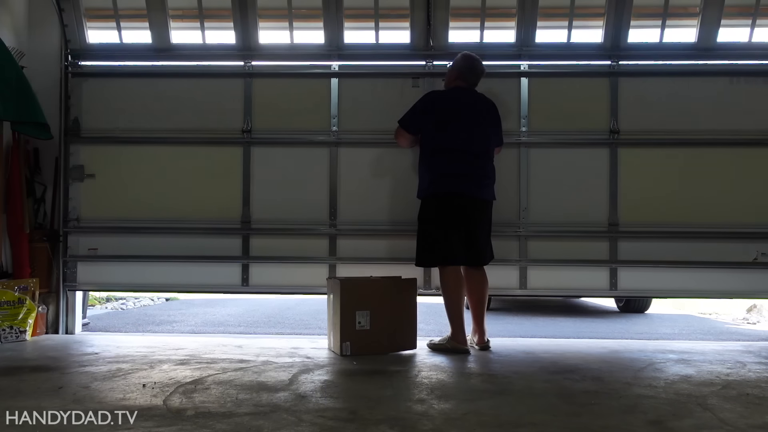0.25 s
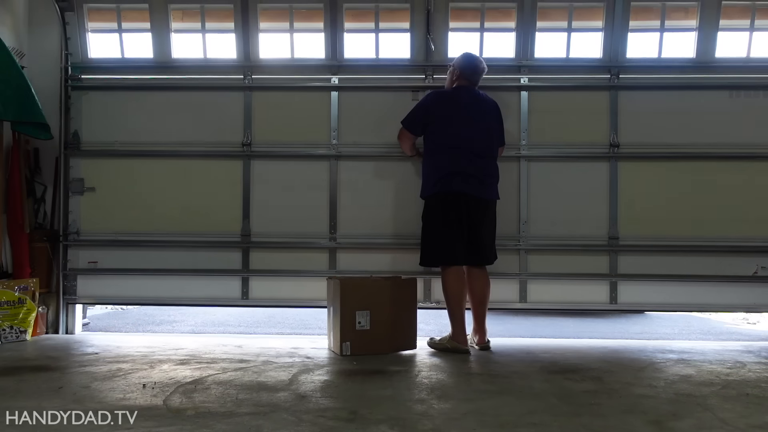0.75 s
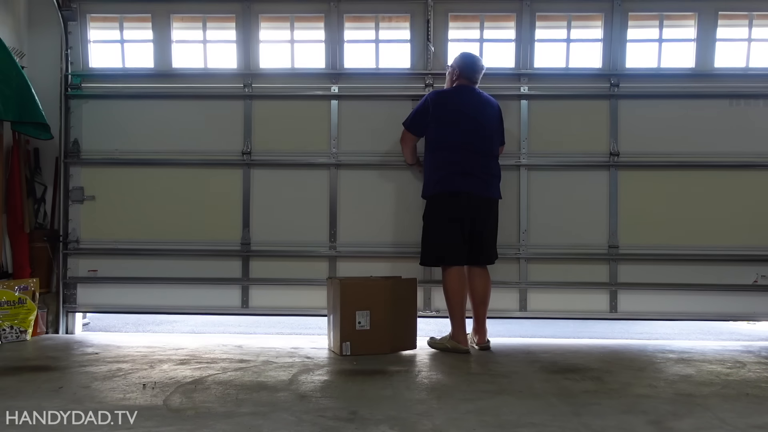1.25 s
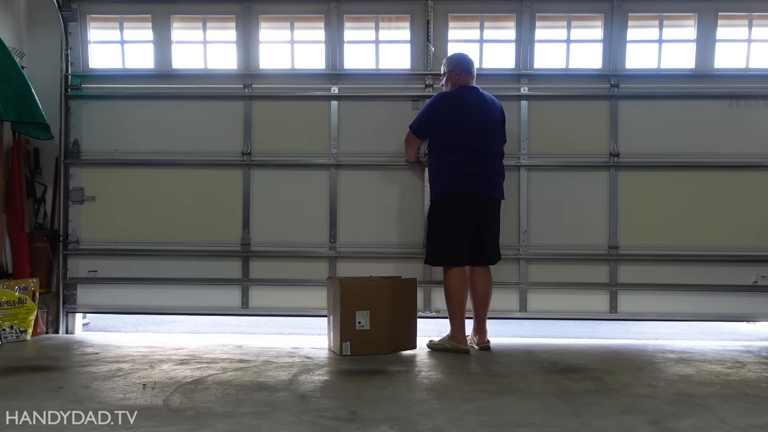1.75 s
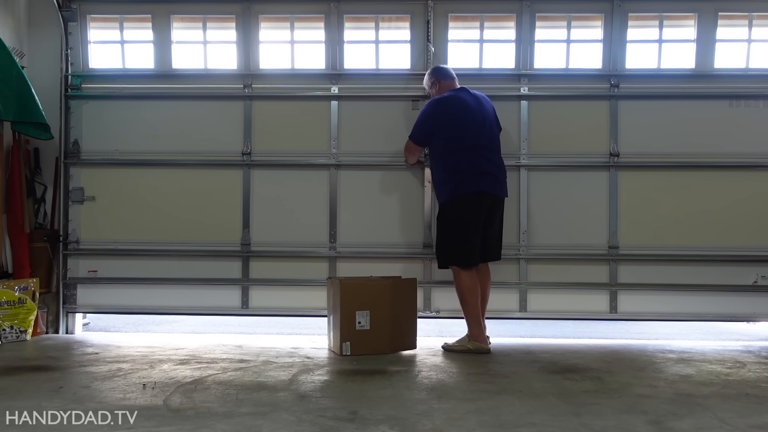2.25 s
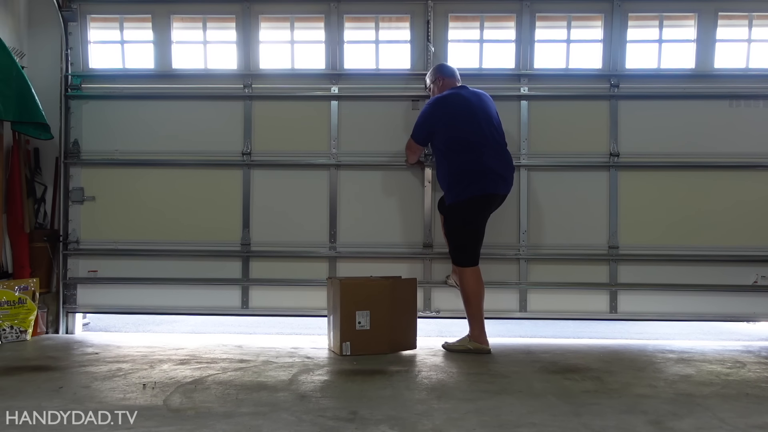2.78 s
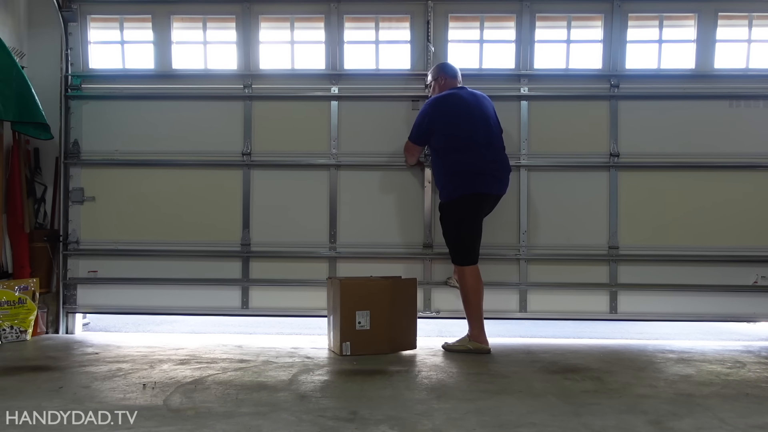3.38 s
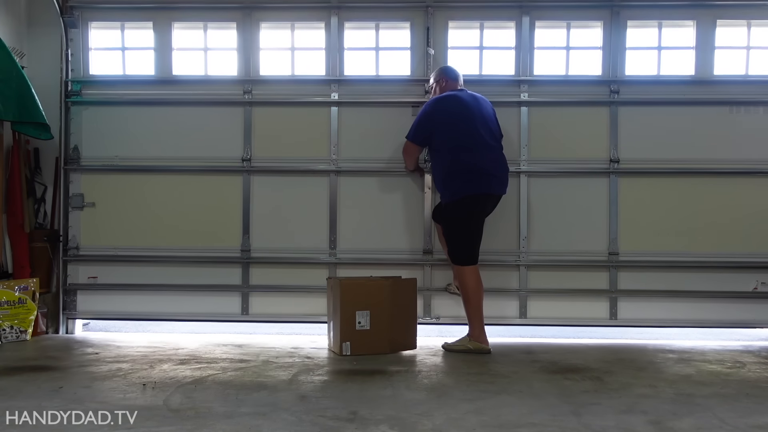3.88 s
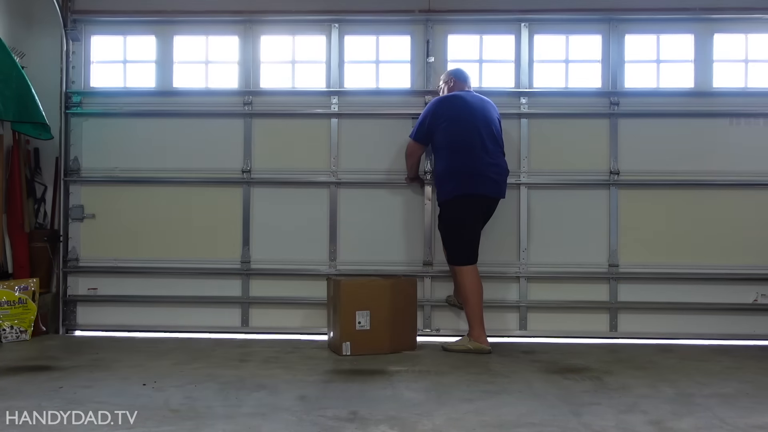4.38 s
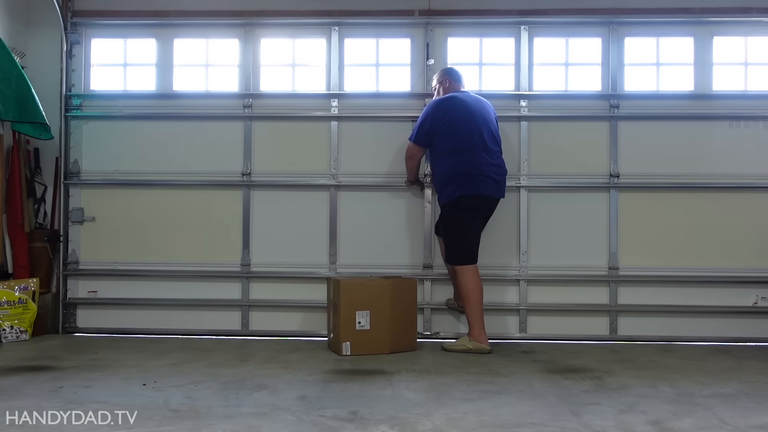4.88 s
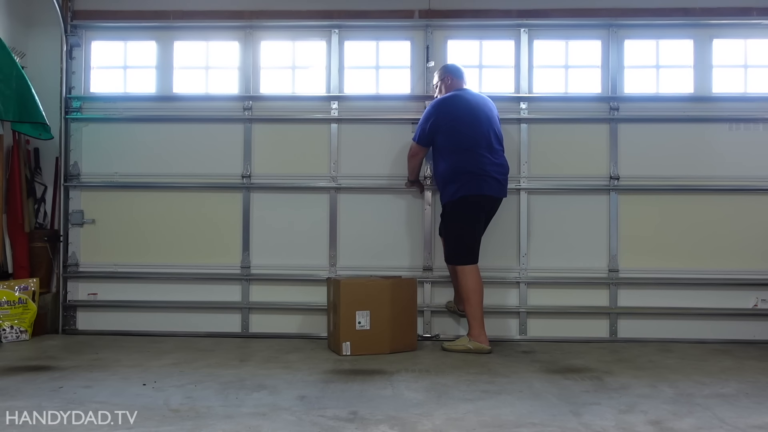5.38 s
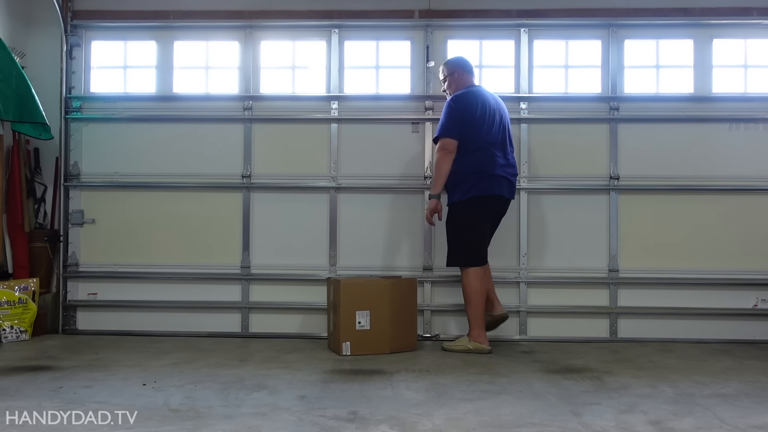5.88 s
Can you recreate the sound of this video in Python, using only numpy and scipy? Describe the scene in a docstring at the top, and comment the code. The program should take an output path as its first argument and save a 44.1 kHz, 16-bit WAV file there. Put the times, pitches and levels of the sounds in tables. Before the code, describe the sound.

Rough, stuttering roller grind and chirping squeals open at once as a heavy metal door moves down its tracks. A few sharp hinge knocks end the first push; quiet follows, with only small creaky ticks. Then the door is forced again: rattling steel, a big booming clatter, a lull, one last hard clank and scrape. Everything rings in a hard, empty garage, heard from some metres away over faint room hush.

```python
"""Sectional garage door forced shut

A steel door is pushed down by hand in several pushes, heard inside a bare, ringing concrete garage.
Rollers grind and scrape (filtered random clicks), skid (short bright rasps) and squeal (wavering partials).
Panels boom and flex (filtered noise); hinges and panels knock (noise bursts plus ringing steel modes).
Sparse decaying taps make the room; steady filtered noise is its hush."""
import sys
import numpy as np
from scipy import signal
from scipy.fft import rfft, irfft, next_fast_len
from scipy.io import wavfile
from scipy.ndimage import uniform_filter1d

SR = 44100
rng = np.random.default_rng(int(sys.argv[2]) if len(sys.argv) > 2 else 0)


def elevation(decibels):
    """Turn decibel levels (scalar or array-like) into linear amplitude ratios."""
    levels = np.asarray(decibels, float)
    return 10 ** (levels / 20)


def put_to_file(sound):
    """Save the sound as 16-bit audio at rate SR, in the file named by the first command-line argument."""
    columns = np.atleast_2d(sound).T  # one column per channel
    safe = np.clip(columns, -1, 1)
    whole_steps = np.round(safe * 32767)
    wavfile.write(sys.argv[1], SR, whole_steps.astype(np.int16))


N = 270774  # samples


def evened(x):
    """Scales to rms 1."""
    return x / np.sqrt(np.mean(x ** 2) + 1e-20)


def read(points, hz):
    """Interpolates a spectrum on a log-frequency axis."""
    point_hz, value = np.transpose(points)
    return np.interp(np.log(hz + 1), np.log(point_hz + 1), value)


def follow(curve):
    """Turns the columns of a timed curve into one value per sample."""
    s, *columns = np.transpose(curve)
    return [np.interp(np.arange(N) / SR, s, column) for column in columns]


def add(mix, start_s, sound):
    """Mixes a sound in at start_s, cut at the end of the mix."""
    part = mix[round(start_s * SR):][:len(sound)]
    part += sound[:len(part)]


def colour(x, db_of_hz):
    """Filters x by a gain curve in dB, then scales to rms 1."""
    gain = elevation(db_of_hz(np.fft.rfftfreq(len(x), 1 / SR)))
    return evened(irfft(rfft(x) * gain, len(x)))


def wander(width):
    """Slow random curve of rms 1: noise averaged twice over width samples."""
    once = uniform_filter1d(rng.standard_normal(N), width)
    return evened(uniform_filter1d(once, width))


def slips(per_s, spread_db):
    """Random clicks, a few of them large."""
    clicks = (rng.random(N) < per_s / SR) * rng.standard_normal(N)
    return clicks * elevation(spread_db * np.minimum(rng.exponential(1, N), 4))


# Hush of the quiet garage. Each row: frequency in Hz, relative level in dB.
AIR_SPECTRUM = [(18, -50), (30, -45.5), (81, -13), (295, 9), (473, -20.5), (720, -9.5), (800, -23),
                (1710, -27), (2610, -38), (3130, -35), (11400, -45.5), (14400, -38.5), (16000, -64)]
# Left-right likeness, for hush and room. Each row: frequency in Hz, likeness from 0 to 1.
LIKENESS = [(60, 0.99), (250, 1), (700, 0.96), (1500, 0.84), (4000, 0.87), (9000, 0.8), (15000, 0.61)]


def air():
    """Steady hush of garage and microphone: filtered noise, wider where left and right are less alike."""
    level_db, side_db = -57.5, -7.5
    mid, side = rng.standard_normal((2, N))
    unlike_db = lambda hz: 10 * np.log10(1.001 - np.clip(read(LIKENESS, hz), 0, 1))
    mid = colour(mid, lambda hz: read(AIR_SPECTRUM, hz))
    side = colour(side, lambda hz: read(AIR_SPECTRUM, hz) + unlike_db(hz))
    return elevation(level_db) * (mid + elevation(side_db) * side * np.array([[1], [-1]]))


# Decay of the bare room. Each row: frequency in Hz, t60 in s.
ROOM_DECAY = [(100, 0.35), (260, 0.94), (700, 0.53), (1840, 0.66), (4850, 0.72), (12800, 0.43)]


def garage(x, wet_db):
    """Direct sound plus sparse random taps, each band dying at its own speed; treble differs left and right."""
    taps = np.zeros((2, SR))
    at = np.arange(120, SR - 20, 20) + rng.integers(0, 20, (2, (SR - 121) // 20))
    np.put_along_axis(taps, at, rng.choice([-1., 1.], at.shape), 1)
    hz, t, bands = signal.stft(taps, SR, nperseg=256)
    bands = bands * elevation(-60 * t / read(ROOM_DECAY, hz)[:, None])
    mid = bands[0]
    side = bands[1] * np.sqrt(1 - np.clip(read(LIKENESS, hz), 0, 1))[:, None]
    tail = signal.istft(np.array([mid + side, mid - side]), SR, nperseg=256)[1]
    tail *= elevation(wet_db) / np.linalg.norm(tail[0])
    tail[:, 0] += 1  # direct sound
    return signal.oaconvolve(x[None], tail, axes=1)[:, :N]


# Modes of the door steel. Each row: frequency in Hz, level in dB, t60 in s.
STEEL_MODES = [(607, -1, 0.26), (700, -11, 0.56), (718, -11, 0.55), (796, -11.5, 0.18), (880, -25, 0.26),
               (1033, -6.5, 0.38), (1130, 0.5, 0.1), (1250, -9.5, 0.11), (1410, -7.5, 0.8),
               (1555, -13.5, 0.2), (1726, -10.5, 0.23), (1894, -6.5, 1.4), (1974, -7.5, 0.37),
               (2250, -15, 0.44), (2494, -23.5, 0.18), (2800, -19.5, 0.48), (2880, -16.5, 0.67),
               (3143, -25.5, 0.83), (4100, -23, 0.51), (4510, -31, 0.74), (4950, -14.5, 0.69),
               (5300, -31.5, .8), (6250, -12.5, 1.4), (6660, -17, 0.85), (8000, -11.5, 0.72),
               (8620, -14.5, 0.36), (9430, -14.5, 0.5), (10340, -18.5, 0.39), (10630, -12.5, .3),
               (11350, -16.5, 0.36)]


def steel(hz, damping, shares_db=0):
    """Summed resonance peaks of the door steel in dB; more damping widens them."""
    mode_hz, mode_db, t60_s = np.transpose(STEEL_MODES)[:, :, None]
    peaks = elevation(mode_db + shares_db) ** 2 / (1 + ((hz - mode_hz) * t60_s / damping) ** 2)
    return 10 * np.log10(peaks.sum(0) + 1e-12)


# Knocks of hinges and panels. Each row: start in s, level in dB, brightness in dB,
# frequency of the part struck in Hz, boost of that part in dB, rattle time constant in s.
KNOCK_ROWS = [(1.208, -21.5, 3.5, 4900, 2.5, 0.02), (1.506, -25.5, 3, 3060, 11.5, 0.017),
              (1.577, -24, -4, 3230, 1, 0.0086), (1.84, -44.5, -8, 3080, -2, 0.01),
              (1.981, -52, 3.5, 3400, 11, 0.022), (2.858, -54.5, -11, 2590, 21.5, .032),
              (3.159, -43, -47.5, 810, 19, 0.02), (3.377, -50.5, 4, 3214, 15.5, 0.028),
              (3.385, -47.5, -30, 1040, 1, 0.04), (3.702, -43.5, -14, 600, 13, 0.032),
              (3.78, -30, 6.5, 4900, 5, 0.016), (3.965, -23, 5, 8900, 13, .013),
              (4.008, -19, 0, 5050, 7, 0.018), (4.153, -13, 1.5, 2270, 11.5, 0.0081),
              (4.163, -20.5, -9, 2660, 14, 0.018), (4.17, -27.5, -11, 4580, 16, 0.043),
              (4.345, -32, 18, 7400, -.5, 0.0037), (4.452, -28, -9.5, 2995, 10.5, 0.015),
              (4.74, -60.5, -15.5, 2640, 5, 0.011), (4.895, -53, -22.5, 2880, 27, .014),
              (4.996, -47.5, -18, 2960, 25, 0.019), (5.126, -16, 6, 5160, 3, 0.011),
              (5.15, -21.5, -16, 615, 8, 0.098), (5.738, -50, 1, 4940, -15, 0.023),
              (6.03, -53.5, -30, 1200, -4, 0.032), (6.095, -57.5, 2, 7020, 7, 0.009)]
# Flat colour of a knock. Each row: frequency in Hz, relative level in dB.
CLANK_SPECTRUM = [(88, -30.5), (150, -16.5), (341, -10.5), (524, -6.5), (853, -9), (1450, -6.5),
                  (2220, -12.5), (3690, -11.5), (4670, -7), (7310, -11.5), (8220, -16), (15100, -23.5),
                  (16000, -50)]


def knock(level_db, bright_db, struck_hz, struck_db, rattle_s):
    """A noise burst that rattles out and leaves the door steel ringing faintly."""
    ring_db = -37.5
    t = np.arange(SR) / SR
    thud_db = -8 - 0.49 * bright_db  # duller knocks have more thud
    balance = lambda hz: read([(1700, thud_db), (2600, 0.0035), (5500, 0.0097), (8000, bright_db)], hz)
    # the part that is hit rings most
    struck = lambda hz: struck_db / (1 + ((hz - struck_hz) / (.035 * struck_hz)) ** 2)
    # each blow lands elsewhere: mode shares in dB, phases in radians
    shares_db, phase = rng.standard_normal((len(STEEL_MODES), 2)).T[:, :, None] * 4.46
    resonance = lambda hz: 10 * np.log10(1 + 81.0 * elevation(steel(hz, 16.5, shares_db)) ** 2)
    tone = lambda hz: read(CLANK_SPECTRUM, hz) + balance(hz) + struck(hz) + resonance(hz)
    burst = colour(rng.standard_normal(len(t)), tone) * np.exp(-t / np.clip(rattle_s, .001, .2))

    mode_hz, mode_db, t60_s = np.transpose(STEEL_MODES)[:, :, None]
    free = mode_hz > 2400  # insulated panels damp the low modes; brackets and tracks ring on
    decay = elevation(mode_db + shares_db + balance(mode_hz) - 60 * t / t60_s)
    modes = free * decay * np.sin(2 * np.pi * mode_hz * t + phase)
    attack = np.minimum(t / (.05 * rattle_s), 1)  # a long rattle also starts softly
    return elevation(level_db) * (burst + elevation(ring_db) * modes.sum(0)) * attack


# Rollers that stick and slip fast enough to sing. Each row: start in s, end in s, slip rate in Hz,
# level of partial 1 in dB, level of partial 2 in dB.
SQUEAL_ROWS = [(0, 0.066, 700, -26, -22), (0.108, 0.265, 895, -29, -52), (.26, 0.402, 858.5, -23, -32.5),
               (.37, 0.536, 847, -22.5, -31.5), (0.537, 0.635, 710.4, -46, -32.5),
               (0.601, 0.724, 723.5, -30, -57), (0.671, 0.809, 696.7, -44, -28.5),
               (.56, 1.167, 855, -33, -66), (0.837, 0.986, 703, -51, -41), (1.166, 1.209, 640, -29, -25.5),
               (1.337, 1.381, 3140, -40.5, -68), (1.577, 1.625, 3106, -46.5, -68),
               (3.701, 3.77, 623, -38, -51.5), (3.84, 4.096, 880, -31, -50.5), (4.01, 4.085, 940, -51, -30),
               (4.762, 5.09, 884.5, -40, -75), (5.074, 5.132, 944, -26, -44),
               (5.074, 5.128, 2894, -40, -65.5)]


def squeal(start_s, end_s, slip_hz, first_db, second_db):
    """Uneven stick-slip cycles: a sagging, wavering stack of four partials."""
    sag_hz_per_s = 22
    waver_hz = 14 / 1.5 if second_db > first_db else 28  # of partial 1
    count = round((end_s - start_s) * SR)
    hz = slip_hz - sag_hz_per_s * np.arange(count) / SR + waver_hz * wander(200)[:count]
    turns = np.cumsum(hz) / SR
    weaker_db = min(first_db, second_db)
    partials_db = [first_db, second_db, weaker_db - 9, weaker_db - 17]
    stack = sum(elevation(db) * np.sin(2 * np.pi * (k + 1) * turns) for k, db in enumerate(partials_db))
    return stack * elevation(0.53 * wander(250)[:count]) * signal.windows.tukey(count, .35)


# Rollers skidding on the track. Each row: start in s, rise in s, end in s, level in dB,
# tilt in dB per octave above 6 kHz (below, the level falls as steeply towards the bass).
SKID_ROWS = [(0, 0.024, .07, -27.5, 15), (0.108, 0.011, .18, -28, 12.5), (.248, 0.012, .35, -25.5, 14),
             (.36, .026, .485, -24, 14), (.541, 0.0045, .59, -29, 8.5), (2.117, 0.015, 2.23, -49.5, -3),
             (2.9, .044, 3, -64.5, -3), (4.021, 0.019, 4.09, -31.5, -3.5), (4.162, .0089, 4.26, -38.5, -3),
             (5.127, 0.0015, 5.35, -23.5, -7)]
# Steel-on-steel scrape, for skids and rolling. Each row: frequency in Hz, relative level in dB.
SCRAPE_SPECTRUM = [(1650, -16), (2800, -7), (3310, -9), (3830, -6.5), (4210, -3), (4630, -5.5),
                   (4980, -4.5), (6190, -4), (7010, -3.5), (10900, -7), (16000, -16)]


def skid(start_s, rise_s, end_s, level_db, tilt_db):
    """A short bright rasp of dense slips that excites the steel modes."""
    fall_share = 0.38  # part of the skid that fades out
    t = np.arange(round((end_s - start_s) * SR)) / SR
    shares_db = 2.4 * rng.standard_normal((len(STEEL_MODES), 1))
    tilt = lambda hz: np.where(hz > 6000, tilt_db, abs(tilt_db)) * np.log2(hz / 6000 + 0.083)
    resonance = lambda hz: 10 * np.log10(1 + 60. * elevation(steel(hz, 23.0, shares_db)) ** 2)
    tone = lambda hz: read(SCRAPE_SPECTRUM, hz) + tilt(hz) + resonance(hz)
    rasp = colour(slips(12000, 0.73)[:len(t)], tone)
    rise = np.minimum(t / max(rise_s, .001), 1)
    fall = np.minimum((t[-1] - t) / (fall_share * t[-1]), 1)
    return elevation(level_db) * rasp * rise * fall


# Door motion. Each row: time in s, level of roller grind in dB, level of scrape in dB.
MOTION_CURVE = [(0, -30.5, -35), (.08, -32.5, -44), (.22, -34, -46), (.41, -30, -38), (.52, -33, -43),
                (.78, -34, -48), (1.05, -38.5, -54.5), (1.24, -34, -51), (1.43, -43.5, -63),
                (1.6, -56, -74), (1.78, -46.5, -67), (2.02, -63, -73), (2.37, -77, -76), (2.84, -78.5, -88),
                (2.88, -53, -71), (3.04, -52.5, -75), (3.14, -58.5, -77), (3.36, -68, -85.5),
                (3.66, -57.5, -73), (3.71, -42.5, -66.5), (3.93, -37.5, -45.5), (4.05, -25, -42.5),
                (4.14, -29.5, -42), (4.17, -22.5, -31), (4.4, -39, -48.5), (4.58, -50, -66.5),
                (4.86, -46, -60), (5.06, -44, -63), (5.13, -27, -51), (5.26, -30.5, -40.5),
                (5.4, -46.5, -59), (5.5, -53, -86), (5.66, -60, -80), (5.78, -63, -70.5), (5.92, -66, -78)]
# Panels shaking under each push. Each row: time in s, level of panel boom in dB, level of whole-door flex in dB.
SHAKE_CURVE = [(0, -46, -59.5), (.77, -45.5, -43), (1.15, -46.5, -53.5), (1.25, -48.5, -48),
               (1.6, -53, -50), (2.02, -60, -66), (2.84, -68, -82), (2.89, -46.5, -57), (3.1, -70, -62),
               (3.17, -49, -59), (3.4, -63, -65), (3.65, -57.5, -58), (3.72, -49, -48), (3.93, -44.5, -55),
               (4.07, -38, -40), (4.17, -28, -35.5), (4.27, -35.5, -40.5), (4.55, -47, -46.5),
               (4.75, -51.5, -57), (4.87, -37.5, -47), (5.06, -48, -53.5), (5.17, -29.5, -40),
               (5.27, -47, -41.5), (5.45, -61, -65), (5.88, -60, -76), (6.09, -56, -54.5)]
# Roller grind, panel boom, whole-door flex. Each row: frequency in Hz, relative level in dB.
GRIND_SPECTRUM = [(180, -51.5), (300, -36), (366, -19), (522, -9), (876, 3.5), (1150, -13.5), (1420, -5),
                  (2170, -20.5), (2680, -18), (5000, -25), (6500, -69), (11000, -120)]
BOOM_SPECTRUM = [(110, -47.5), (180, -10.5), (237, 4.5), (280, -0.5), (381, 1), (440, -12), (480, -3.5),
                 (620, -28.5), (1060, -120)]
FLEX_SPECTRUM = [(18, -53.5), (30, -25), (70, -9), (89, -3.5), (102, 0), (116, 0), (146, -3.5), (180, -2.5),
                 (230, -28.5), (400, -120)]


def rolling():
    """Roller slips ring the door modes and scrape brightly; noise bands are the panels' boom and flex."""
    grind_db, scrape_db = follow(MOTION_CURVE)
    boom_db, flex_db = follow(SHAKE_CURVE)
    resonance = lambda hz: 10 * np.log10(1 + 14. * elevation(steel(hz, damping=6.5)) ** 2)
    grind = colour(slips(5000, 0.96), lambda hz: read(GRIND_SPECTRUM, hz) + resonance(hz))
    boom = colour(rng.standard_normal(N), lambda hz: read(BOOM_SPECTRUM, hz))
    flex = colour(rng.standard_normal(N), lambda hz: read(FLEX_SPECTRUM, hz))
    scrape = colour(slips(9000, 0.6), lambda hz: read(SCRAPE_SPECTRUM, hz))
    grind *= elevation(grind_db + 0.8 * wander(900))
    boom *= elevation(boom_db + 2.6 * wander(1500))
    flex *= elevation(flex_db + 1.5 * wander(2500))
    scrape *= elevation(scrape_db + 2.0 * wander(700))
    return grind + boom + flex + scrape


def scene():
    """Knocks from three places and the rollers, each with its own path through the garage, over the hush."""
    places, rollers = np.zeros((3, N)), rolling()
    for k, (start_s, *row) in enumerate(KNOCK_ROWS):
        add(places[k % 3], start_s, knock(*row))
    for row in SKID_ROWS:
        add(rollers, row[0], skid(*row))
    for row in SQUEAL_ROWS:
        add(rollers, row[0], squeal(*row))
    knocks = sum(garage(x, wet_db=3.5) for x in places)
    return knocks + garage(rollers, wet_db=-2.5) + air()


def roll_off(x):
    """The treble ends steeply here."""
    return signal.sosfilt(signal.butter(12, 16120, fs=SR, output="sos"), x)


# Microphone in its housing. Each row: frequency in Hz, gain in dB.
MIC_RESPONSE = [(20, -22.5), (55, -6), (90, -9.5), (3200, 2.5), (3800, -2), (4500, -1), (15900, -4),
                (16250, -60)]


def record(dry):
    """Filters the mix by the microphone's frequency response."""
    size = next_fast_len(N + SR)
    gain = elevation(read(MIC_RESPONSE, np.fft.rfftfreq(size, 1 / SR)))
    heard = irfft(rfft(dry, size) * gain, size)[:, :N]
    return roll_off(heard)


dry = scene()
out = record(dry)
put_to_file(out)
```